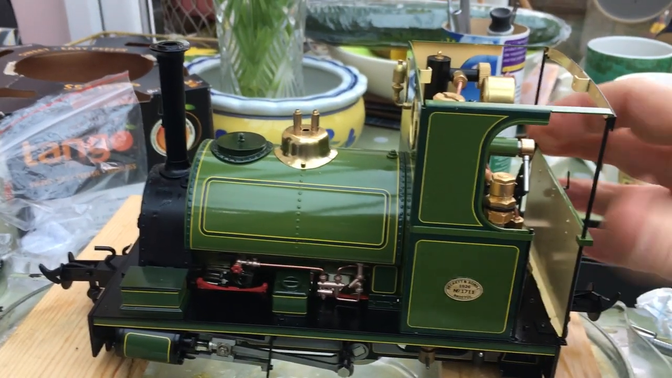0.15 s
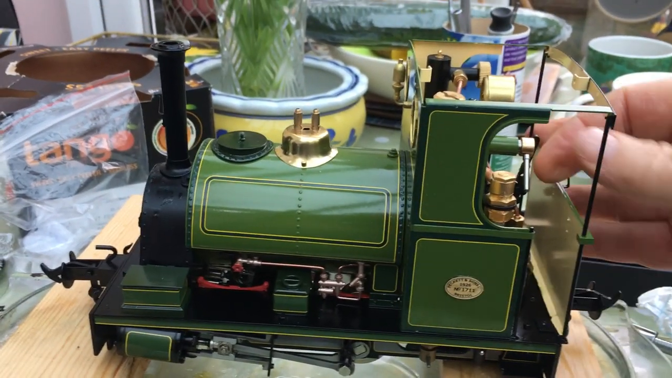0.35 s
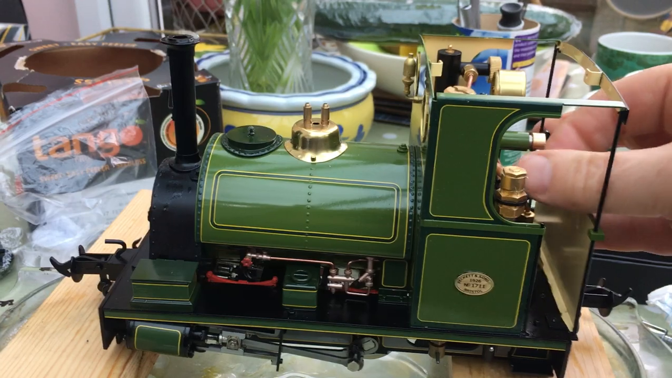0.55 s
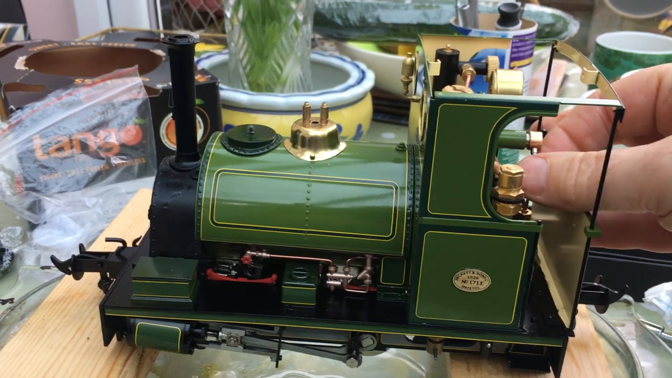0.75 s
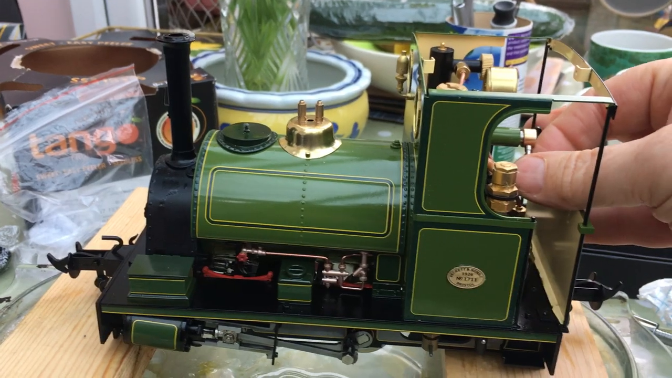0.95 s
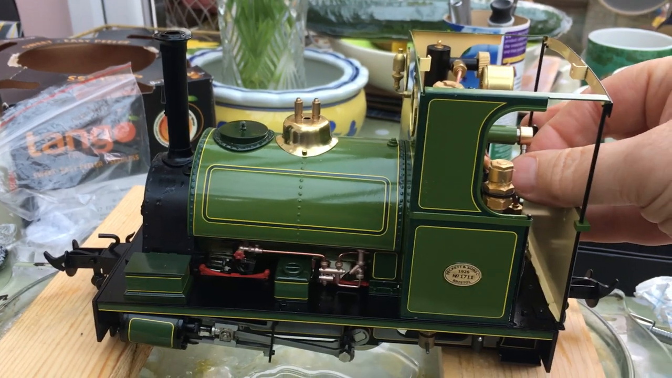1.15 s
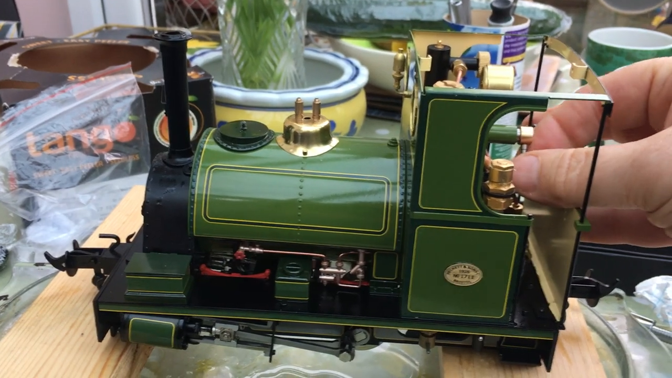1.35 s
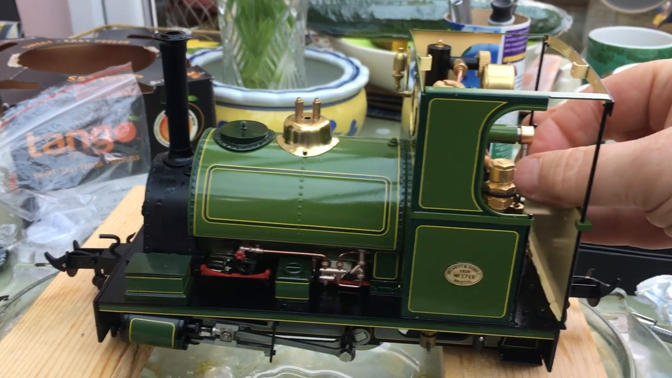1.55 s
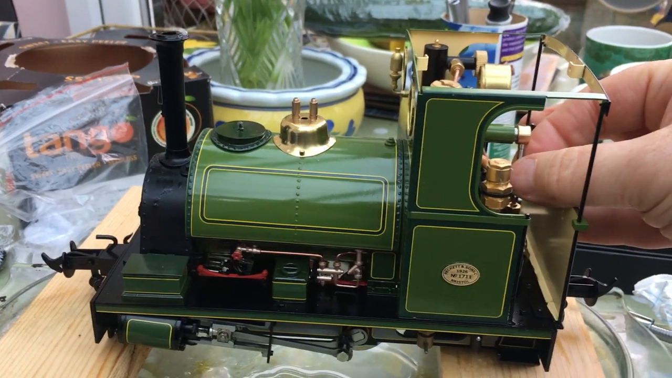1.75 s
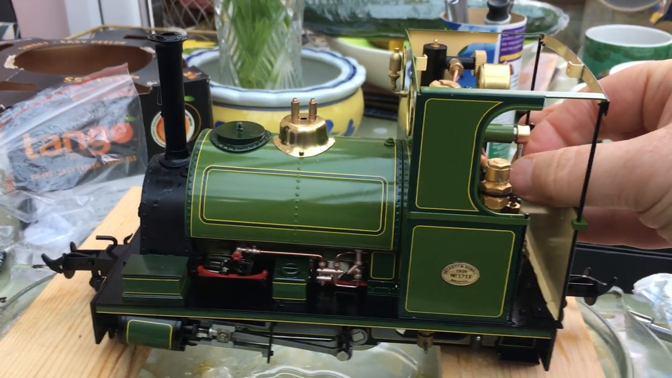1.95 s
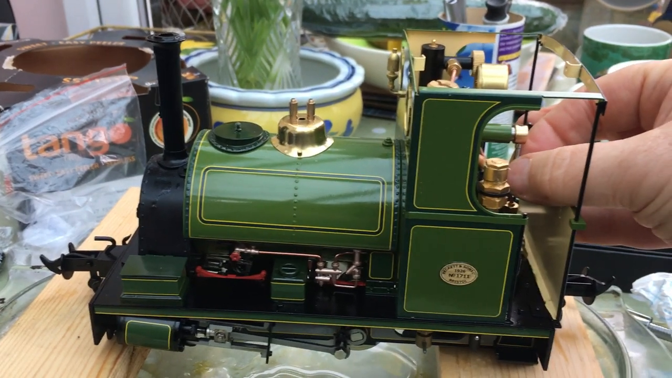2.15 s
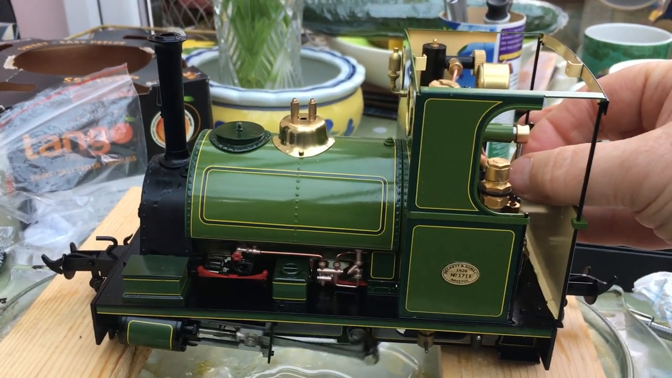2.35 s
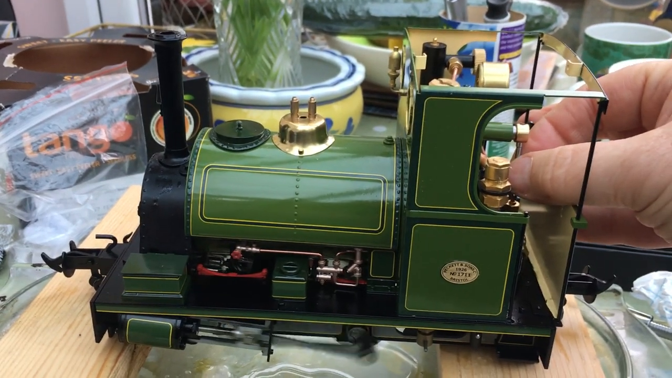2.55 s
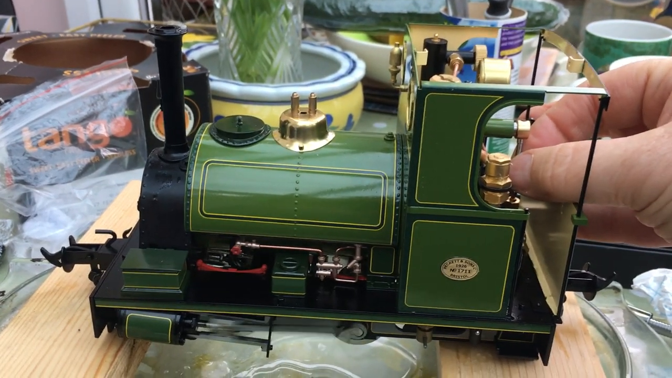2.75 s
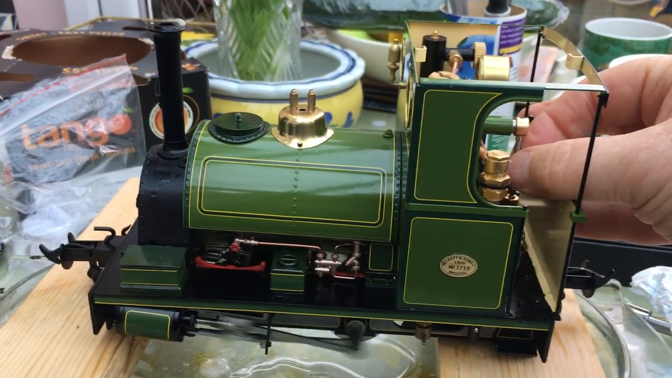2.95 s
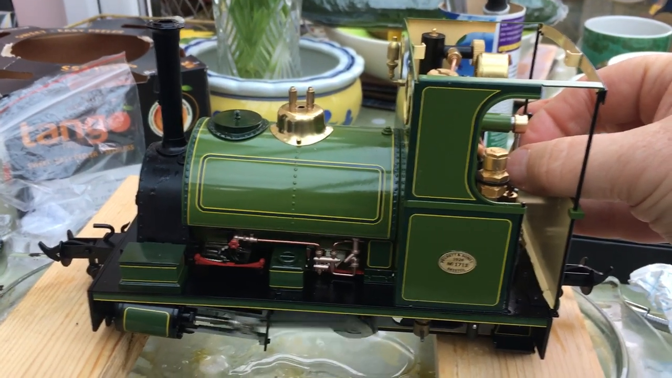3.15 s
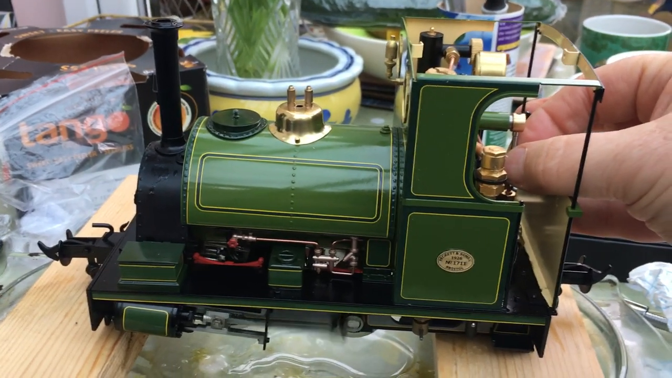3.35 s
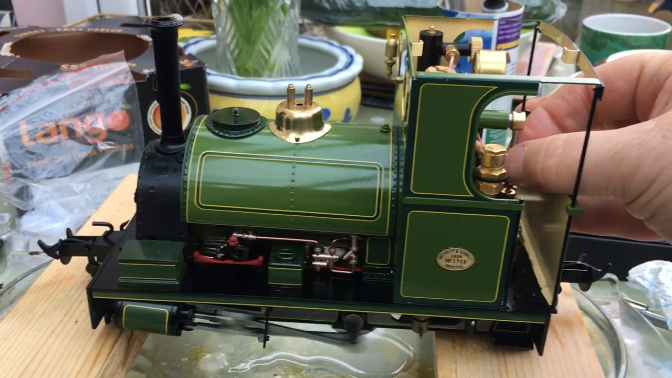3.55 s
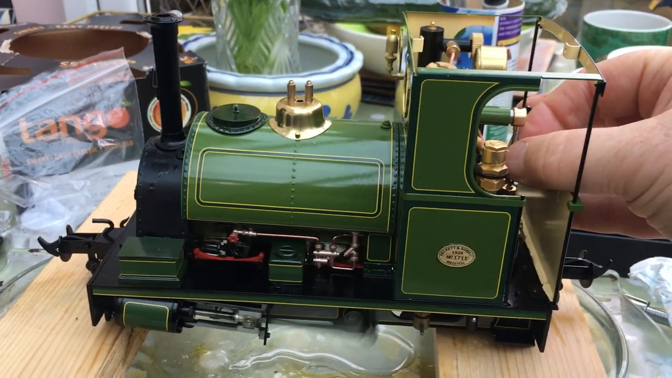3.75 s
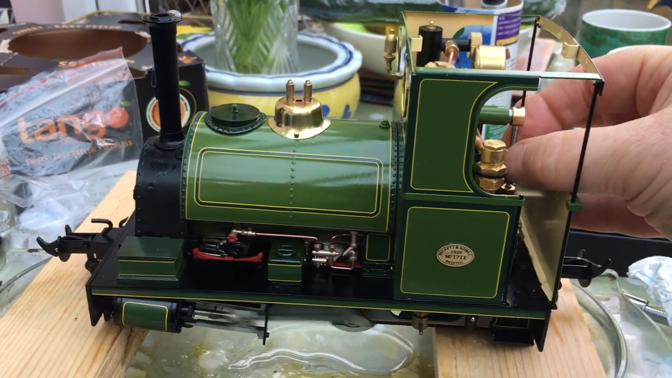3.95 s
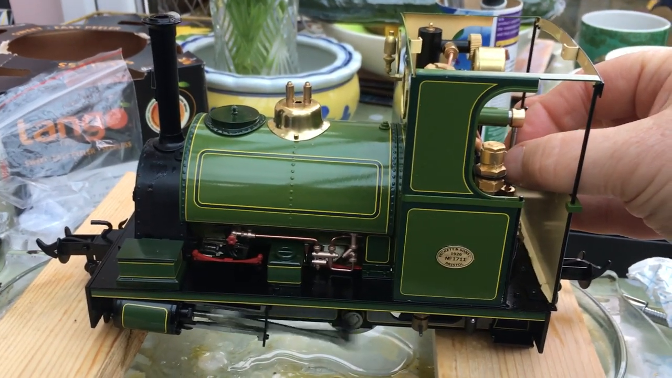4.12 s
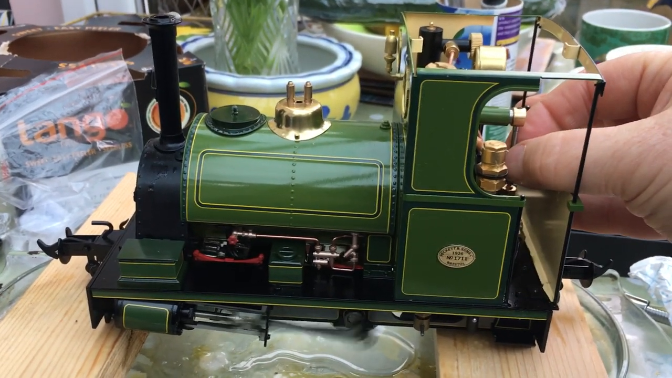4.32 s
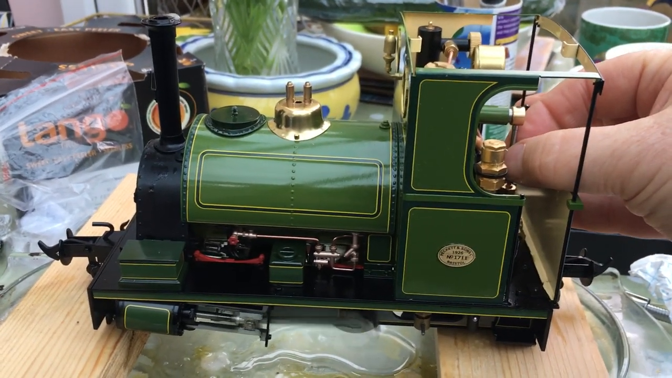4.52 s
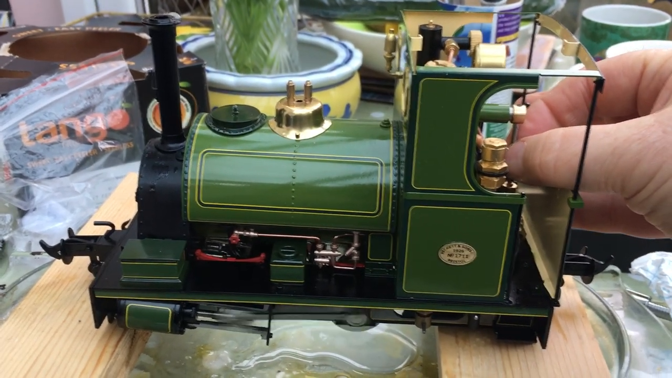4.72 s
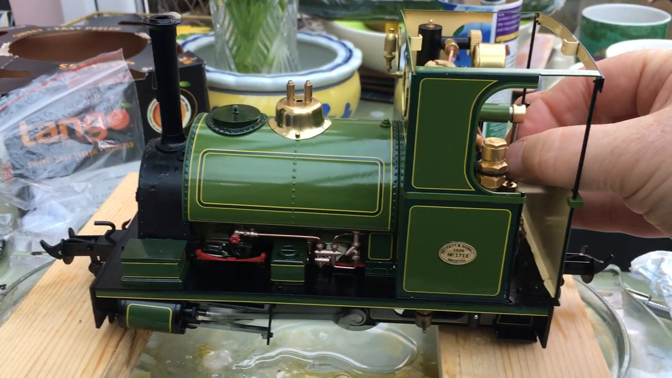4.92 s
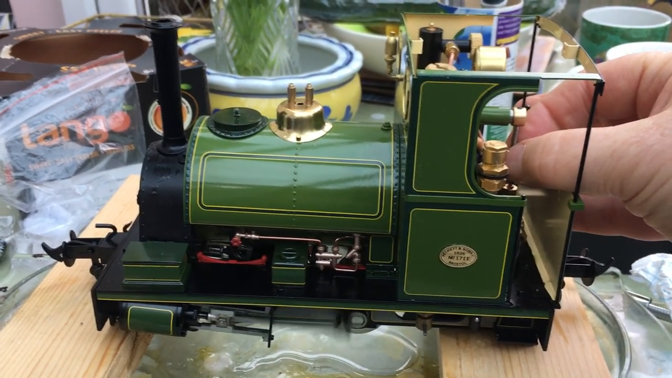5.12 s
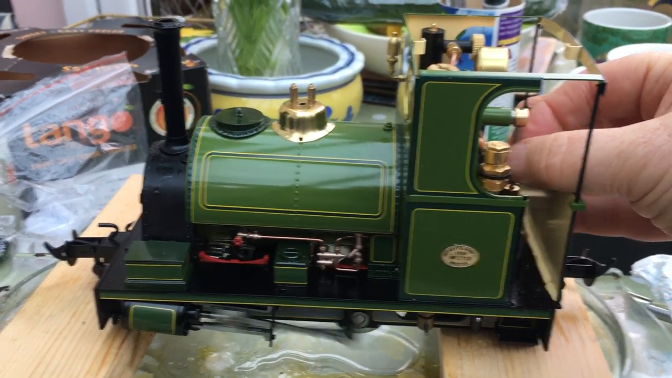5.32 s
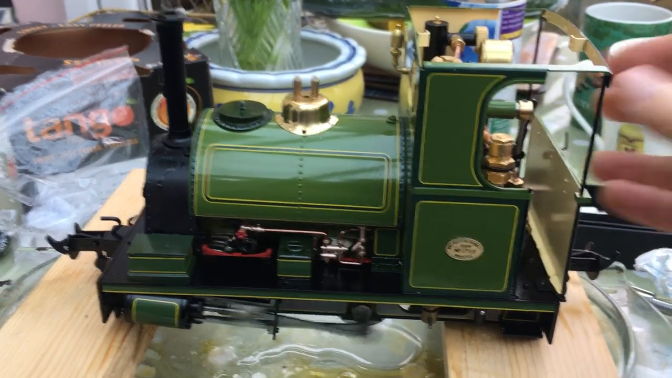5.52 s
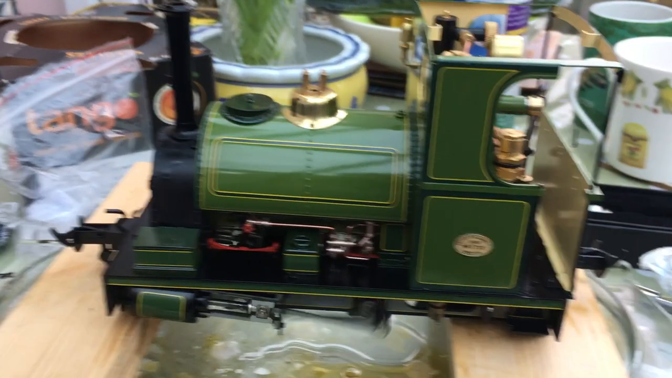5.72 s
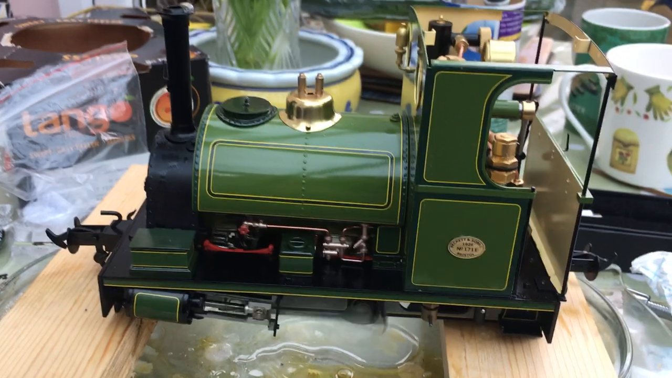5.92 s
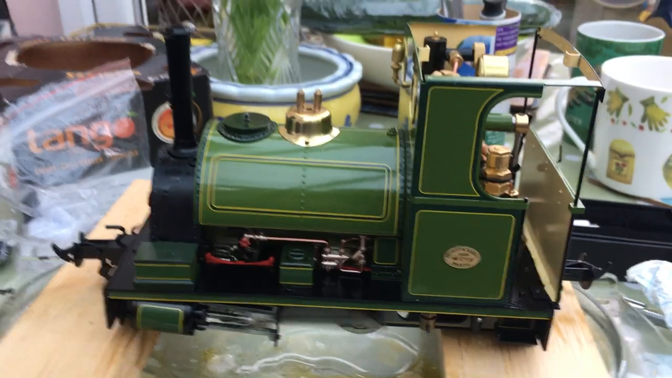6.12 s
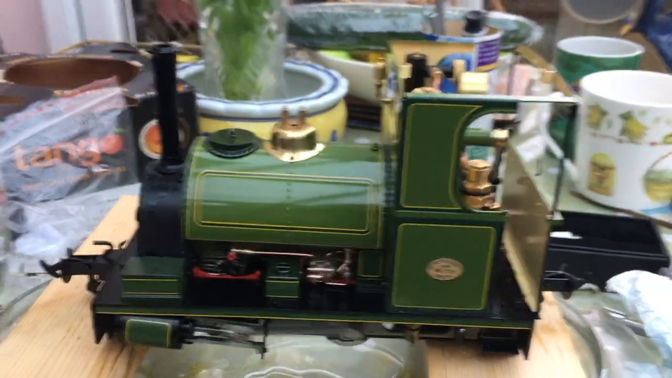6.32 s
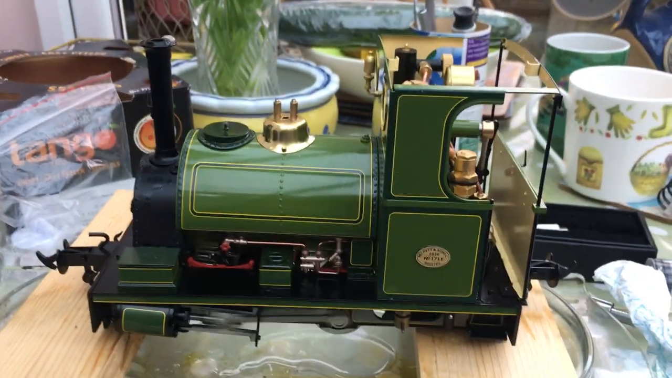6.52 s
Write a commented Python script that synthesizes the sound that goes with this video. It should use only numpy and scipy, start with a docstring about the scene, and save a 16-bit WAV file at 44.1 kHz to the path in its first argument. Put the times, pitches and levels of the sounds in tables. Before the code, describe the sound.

The gas burner of a small model steam locomotive hisses with a soft, steady roar. After a couple of seconds the engine gives a few uneven coughs and knocks, then races with its wheels spinning free. Very rapid puffs of steam blend with a rhythmic clatter of rods and axles, while the stand shakes with a low rumble. It is heard close up in a small room.

```python
"""A small live-steam locomotive stands on blocks on a table, its burner hissing in the boiler flue.
The regulator opens: the engine coughs, then races with its wheels free at about nine turns a second.
Each turn gives four puffs up the chimney and one pattern of knocks from the play in rods and axles.
The unbalanced wheels shake the stand, a few drops of water spit in the blast, and a small room answers."""
import sys
import numpy as np
from scipy import signal
from scipy.fft import rfft, irfft
from scipy.io import wavfile

SR = 44100
rng = np.random.default_rng(int(sys.argv[2]) if len(sys.argv) > 2 else 0)


def generate_wav(signal):
    """Clip the signal to [-1, 1] and save it as 16-bit WAV at the path in sys.argv[1]."""
    frames = np.transpose(np.atleast_2d(signal))
    scaled = np.clip(frames, -1, 1) * 32767
    pcm = np.round(scaled).astype(np.int16)
    wavfile.write(sys.argv[1], SR, pcm)


N = 294588
TIME = np.arange(N) / SR
OPEN_S, OPENING_S = 2.33, .035  # when the regulator opens; how fast steam reaches the cylinders

# Resonances that colour each source: pitch_hz, width_hz, gain_db
FLUE_MODES = [(175, 90, -7.5), (1192, 65, -7), (1405, 160, -7), (1690, 150, -2), (1796, 200, -3),
              (2137, 340, -5.5), (2520, 170, -8.5), (2974, 275, -6.5), (3337, 430, -7.5), (3782, 276, -1.5),
              (3960, 280, 0), (4250, 130, -6), (4694, 200, -9.5), (5160, 110, -10), (5600, 214, -2.5),
              (5855, 350, -4), (7270, 550, -5.5), (7700, 290, -13), (7900, 300, -22), (8750, 370, -12.5),
              (9150, 300, -15.5), (9960, 650, -18.5), (10840, 180, -19), (11250, 260, -13),
              (12080, 360, -10.5), (12700, 620, -11.5), (13300, 400, -21), (14050, 400, -25),
              (15300, 650, -22)]
CAB_MODES = [(1680, 370, -2), (3255, 340, 6.5), (4160, 190, 2), (4610, 450, 1.5), (7300, 300, -11),
             (8640, 610, 4.5)]
STAND_MODES = [(139, 29, -1), (188, 60, -0.5), (248, 43, -5), (341.6, 35, 3.5), (425, 50, -3),
               (619, 40, -4), (725, 42, -4.5)]
CHIMNEY_MODES = [(2495, 150, -2), (3120, 250, -5), (5690, 120, 0.5), (6435, 210, 5), (6686, 280, 3),
                 (9740, 350, -8), (11630, 360, -7.5), (12700, 400, -8), (13450, 450, -8)]
FRAME_MODES = [(337, 31, -13.5), (618, 85, -13.5), (720, 44, -14), (878, 65, -2.5), (951, 119, 1.5),
               (1044, 77, -2.5), (1270, 180, -9.5), (1435, 150, -5.5)]
ROD_MODES = [(332, 45, -9.5), (916, 180, -11), (1320, 177, 0.5), (1437, 140, 5), (1586, 150, 2),
             (1755, 284, 3), (2000, 280, -6), (2575, 165, -5.5), (3100, 570, -14.5)]
SPUTTER_MODES = [(2130, 200, 3), (2580, 300, -2), (3170, 270, -2)]
# Broad tone under the resonances: frequency_hz, gain_db
FLAME_EQ = [(20, -40), (55, -14.5), (110, -7), (200, -4), (300, -11.5), (500, -21), (700, -16.5),
            (1000, -25), (1300, -11), (2750, -21), (3300, -15.5), (5000, -18), (6300, -11.5), (10400, -21),
            (16000, -20.5)]
STAND_EQ = [(20, -50), (70, -7.5), (500, -12.5), (900, -8.5), (2000, -46), (16000, -68)]
STEAM_EQ = [(100, -32), (500, -22), (1200, -5), (2200, -2), (4000, -12.5), (5000, -18.5), (7000, -11),
            (8300, -29), (12500, -16), (16000, -22)]
METAL_EQ = [(20, -53), (150, -20.5), (500, -27), (1200, -28), (2500, -28), (5000, -41), (16000, -50)]
# The gas jet, heard through the open back of the cab until a hand covers it: time_s, level_db
JET_FADE = [(.42, -46.5), (.6, -53.5)]
# Wheels running free: time_s, speed_turns_per_s
WHEEL_SPEED = [(2.653, 6.47), (2.9, 8.08), (3.48, 8.2), (3.75, 9.05), (4.3, 8.89), (5.3, 9.45), (5.65, 9.1),
               (5.95, 9.7), (6.15, 9.49)]
# First uneven puffs: time_s, gain_db
FIRST_COUGHS = [(2.351, 7.5), (2.384, 2), (2.412, 2), (2.477, 7.5), (2.561, 6), (2.613, 7.5), (2.645, 2)]
# Four exhaust beats a turn: angle_turns, gain_db
PUFF_PATTERN = [(.118, -1), (.358, 3), (.61, 2), (.85, 1.5)]
# Steam leaking past the valves: time_s, gain_db
VALVE_LEAK = [(2.45, -13.5), (2.65, -7), (4.8, -7.5), (6.1, -5)]
# Single hard knocks, mostly as the wheels get going: time_s, thud_db, clack_db
STARTING_KNOCKS = [(2.376, -15, -9), (2.413, -7, -13), (2.423, -7, -4.5), (2.468, -6, -14),
                   (2.565, -14, -7), (2.589, -2.5, -9), (2.601, -4, -6), (2.632, -4, -13), (2.741, -2, -9),
                   (2.750, -2, -7), (2.88, -0.5, 0.5)]
# Where rods and axles take up their play: angle_turns, thud_db, clack_db, growth_db, shift_turns
# (growth and shift count for each turn a second of extra speed)
KNOCK_PATTERN = [(.003, -2.5, -3.5, -1, 0), (.258, -10, -5.5, 3, 0), (.355, -1, -5.5, 5, 0),
                 (.5, -4.5, -1.5, -0.5, -.015), (.615, -7.5, -4.5, -3.5, -.02), (.76, -19, -19.5, -13, 0),
                 (.835, -15, -2.5, 3, -.018), (.885, -8.5, -17, -4.5, 0)]
# How hard that pattern hits: time_s, gain_db
KNOCK_FORCE = [(2.7, -2), (3.0, -2.5), (3.55, -0.9), (4.9, 0.7), (6.05, 0.8), (6.3, -1.1)]
# Condensed water spat up the chimney: time_s, gain_db
WATER_DROPS = [(3.252, -32), (3.278, -37), (3.292, -42)]
# Decay of the room: frequency_hz, t60_s
ROOM_DECAY = [(150, 0.67), (1000, 0.33), (4000, 0.31), (15000, 0.17)]


def amp(db):
    """Decibels to amplitude."""
    return 10 ** (np.asarray(db) / 20)


def curve(rows):
    """Envelope in straight lines through rows of time_s, value."""
    return np.interp(TIME, *np.transpose(rows))


def across_bands(rows, hz):
    """Joins rows of frequency_hz, value on a log-frequency axis."""
    points_hz, value = np.transpose(rows)
    return np.interp(np.log(hz + 1), np.log(points_hz), value)


def body(x, modes, eq, size=8192):
    """Rings x through resonances standing on a broad EQ: a causal filter of energy 1."""
    hz = np.fft.rfftfreq(size, 1 / SR)
    peaks = sum(amp(db) ** 2 / (1 + (2 * (hz - pitch) / width) ** 2) ** 2 for pitch, width, db in modes)
    power = amp(across_bands(eq, hz)) ** 2 + peaks
    log_gain = .5 * np.log(np.r_[power, power[-2:0:-1]])
    minimum_phase = np.exp(np.conj(signal.hilbert(log_gain)))
    ring = np.fft.ifft(minimum_phase).real[:size // 2]
    return signal.oaconvolve(x, ring / np.linalg.norm(ring))[:N]


def flutter(rate_hz):
    """Random wavering of rms 1, mostly slower than rate_hz."""
    hz = np.fft.rfftfreq(N, 1 / SR)
    waver = irfft(rfft(rng.standard_normal(N)) / (1 + (hz / rate_hz) ** 2), N)
    return waver / np.sqrt(np.mean(waver ** 2))


def clicks(times_s, heights):
    """One impulse at each time."""
    at = np.round(times_s * SR).astype(int)
    return np.bincount(np.maximum(at, 0), heights, N)[:N]


def swells(times_s, db, rise_s, fall_s):
    """Power envelope with a quick rise to each hit and a slower fall after it."""
    t = np.arange(-SR // 10, SR // 10 + 1) / SR
    shape = np.exp(-abs(t) / np.where(t < 0, rise_s, fall_s))
    return np.maximum(signal.oaconvolve(clicks(times_s, amp(db) ** 2), shape, "same"), 0)


def burner(flame_db=-38.5, flicker_db=0.45):
    """The flame roars steadily in the flue; the gas jet hisses out of the cab."""
    roar = body(rng.standard_normal(N), FLUE_MODES, FLAME_EQ)
    roar *= amp(flame_db + flicker_db * flutter(rate_hz=29))
    jet = body(rng.standard_normal(N), CAB_MODES, eq=[(100, -38), (1000, -25), (3000, -27), (16000, -18)])
    return roar + jet * amp(curve(JET_FADE))


def regulator():
    """Share of the steam let through, from shut to open."""
    return np.clip((TIME - OPEN_S) / OPENING_S, 0, 1)


def crank():
    """Crank angle in turns, counted from the moment the wheels run free."""
    angle = np.cumsum(curve(WHEEL_SPEED)) / SR
    return angle - np.interp(WHEEL_SPEED[0][0], TIME, angle)


def each_turn(angles):
    """Time and wheel speed as the cranks pass these angles, one row a turn."""
    turned = crank()
    passes = np.arange(np.ceil(turned[-1]))[:, None] + angles
    times_s = np.interp(passes, turned, TIME, right=TIME[-1] + 1)
    return times_s, np.interp(times_s, *np.transpose(WHEEL_SPEED))


def stand(shake_db=-51, lurch_db=2.5, settle_s=1.0, throb_db=2.0, rumble_db=-10, full_speed=9.3):
    """Unbalanced wheels shake the blocks, lurching at first; at speed the table rumbles too."""
    lurch = lurch_db * np.exp(-((TIME - OPEN_S) / settle_s) ** 2)
    throb = throb_db * np.cos(2 * np.pi * (crank() - 0.53))  # peaks just past each half turn
    shake = rng.standard_normal(N) * regulator() * amp(shake_db + lurch + throb)
    table = body(shake, modes=[(77.0, 25, 0)], eq=[(20, -42), (70, -20), (400, -68)])
    table *= amp(rumble_db + 5 * (curve(WHEEL_SPEED) - full_speed))  # 5 dB for each turn a second
    return body(shake, STAND_MODES, STAND_EQ) + table


def exhaust(level_db=-39.5, uneven_db=1.1, labour_db=1.5, easy_speed=8.3):
    """Each valve opening sends a puff ringing up the chimney, harder while the engine gathers speed."""
    angles, beat_db = np.transpose(PUFF_PATTERN)
    beat_s, speed = each_turn(angles)
    beat_db = beat_db + labour_db * np.maximum(easy_speed - speed, 0)
    beat_db += uneven_db * rng.standard_normal(beat_s.shape)
    cough_s, cough_db = np.transpose(FIRST_COUGHS)
    puffs = swells(np.append(beat_s, cough_s), np.append(beat_db, cough_db), rise_s=.0032, fall_s=.0057)
    leak = regulator() * amp(curve(VALVE_LEAK))
    blast = np.sqrt(puffs + leak ** 2) * rng.standard_normal(N)
    return amp(level_db) * body(blast, CHIMNEY_MODES, STEAM_EQ)


def loose_joint(times_s, db, modes, scrape_db, chatter_s):
    """A loose joint chatters shut, lands its blow and chatters on; all of it rings the metal."""
    chatter = swells(times_s, db, rise_s=.0016, fall_s=chatter_s)
    scrape = np.sqrt(chatter / (chatter_s * SR)) * rng.standard_normal(N)
    return body(clicks(times_s, amp(db)) + amp(scrape_db) * scrape, modes, METAL_EQ)


def axles_and_rods(thud_db=-10, clack_db=-10.5, jitter_s=.0006, full_speed=9.4, slow_speed=8.0):
    """Axles thud in the frame and rods clack at their crank angles; speed shifts the accents."""
    angles, heavy_db, light_db, growth_db, shift_turns = np.transpose(KNOCK_PATTERN)
    hit_s, speed = each_turn(angles)
    force_db = np.interp(hit_s, *np.transpose(KNOCK_FORCE))
    hit_s += shift_turns * (speed - full_speed) / speed + jitter_s * rng.standard_normal(hit_s.shape)
    force_db += growth_db * (np.maximum(speed, slow_speed) - full_speed)
    force_db += rng.standard_normal(hit_s.shape)  # blows differ by about a dB
    single_s, single_heavy_db, single_light_db = np.transpose(STARTING_KNOCKS)
    hit_s = np.append(hit_s, single_s) - 0.001214  # contact comes just before the ring peaks
    heavy_db = np.append(force_db + heavy_db, single_heavy_db)
    light_db = np.append(force_db + light_db, single_light_db)
    thuds = loose_joint(hit_s, heavy_db, FRAME_MODES, scrape_db=-8.0, chatter_s=.0025)
    clacks = loose_joint(hit_s, light_db, ROD_MODES, scrape_db=-1.5, chatter_s=.0029)
    return amp(thud_db) * thuds + amp(clack_db) * clacks


def spits():
    """Drops of water burst in the blast with a short bright sputter."""
    times_s, db = np.transpose(WATER_DROPS)
    bursts = np.sqrt(swells(times_s, db, rise_s=.0016, fall_s=.004))
    return body(bursts * rng.standard_normal(N), SPUTTER_MODES, METAL_EQ)


def room(send, echoes_per_s=2000, size=256):
    """Sparse reflections of random sign, the treble dying first."""
    taps = rng.choice([-1., 1.], SR // 2) * (rng.random(SR // 2) < echoes_per_s / SR)
    taps[:SR // 250] = 0  # 4 ms pre-delay
    hz, t, bands = signal.stft(taps, SR, nperseg=size)
    decay = amp(-60 * t / across_bands(ROOM_DECAY, hz)[:, None])
    tail = signal.istft(bands * decay, SR, nperseg=size)[1]
    return signal.oaconvolve(send, tail / np.linalg.norm(tail))[:N]


def scene():
    """The engine close up in a small room, in mono."""
    knocks = axles_and_rods()
    hiss = burner() + exhaust() + spits()
    mono = knocks + hiss + stand() + room(amp(-14) * knocks + amp(-16.5) * hiss)
    return np.array([mono, mono])


def record(dry):
    """A steep high cut takes off the very top of the hiss."""
    high_cut = signal.firwin(1023, cutoff=15750, window=("kaiser", 9), fs=SR)
    return signal.oaconvolve(dry, high_cut[None], "same")


dry = scene()
out = record(dry)
generate_wav(out)
```